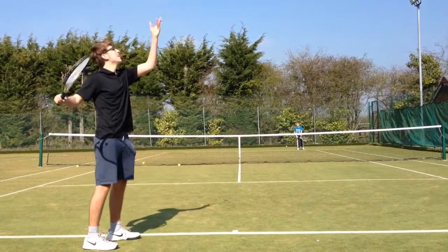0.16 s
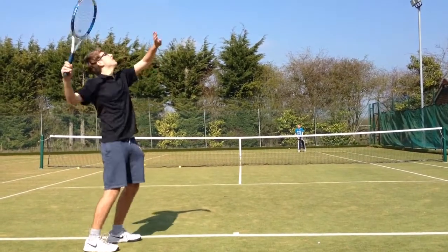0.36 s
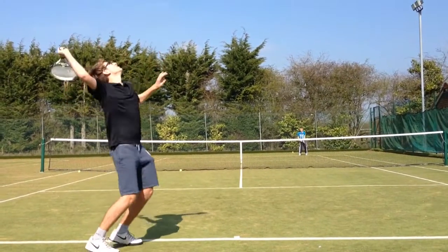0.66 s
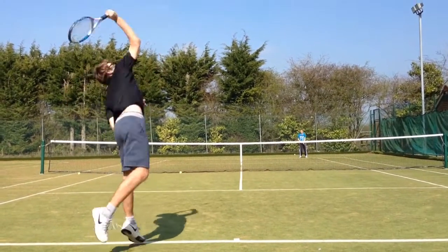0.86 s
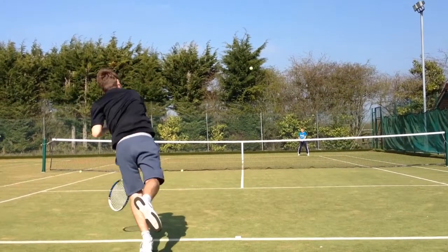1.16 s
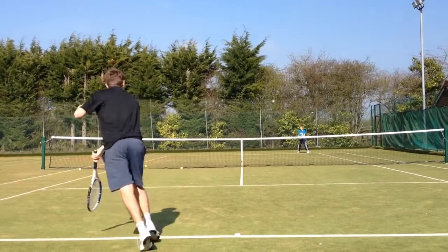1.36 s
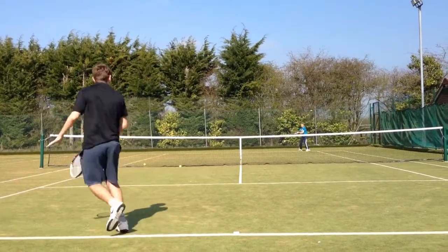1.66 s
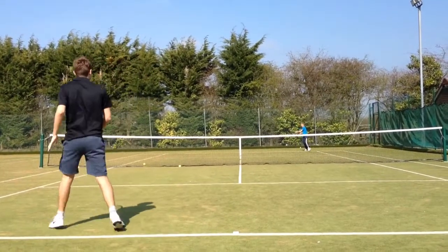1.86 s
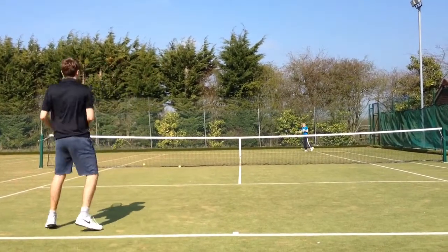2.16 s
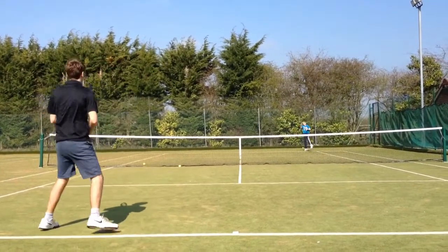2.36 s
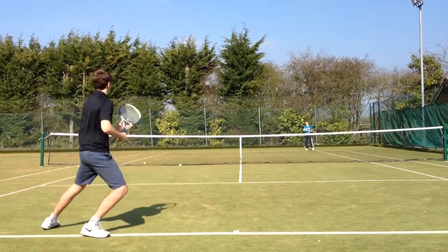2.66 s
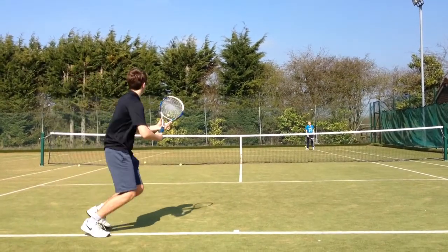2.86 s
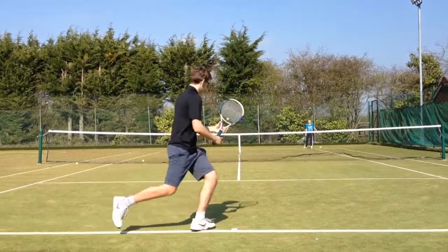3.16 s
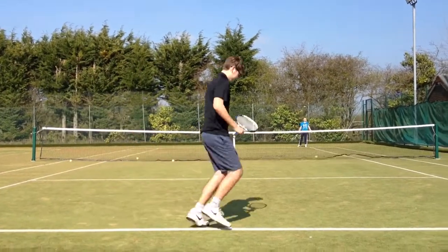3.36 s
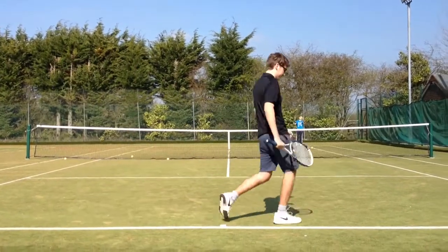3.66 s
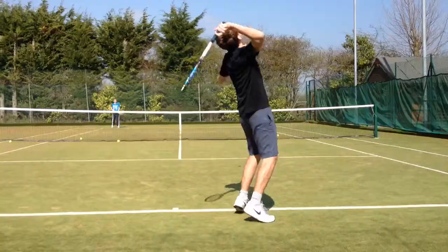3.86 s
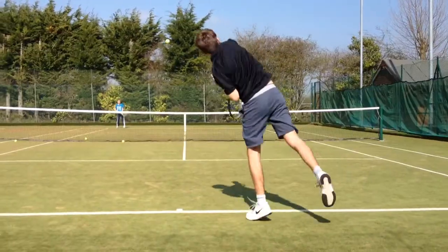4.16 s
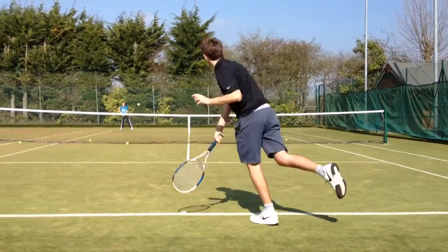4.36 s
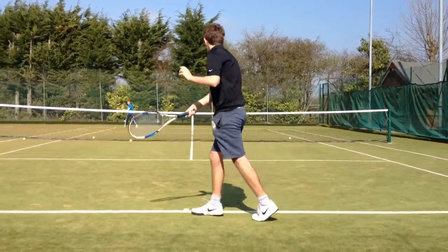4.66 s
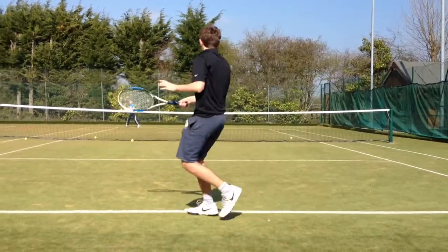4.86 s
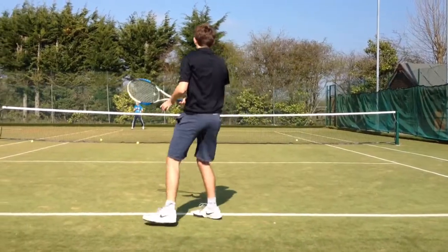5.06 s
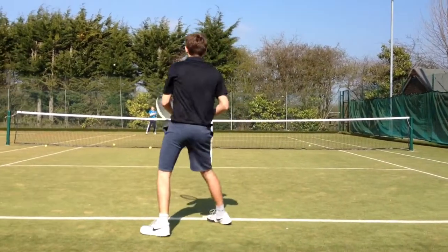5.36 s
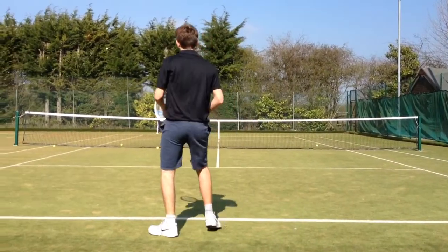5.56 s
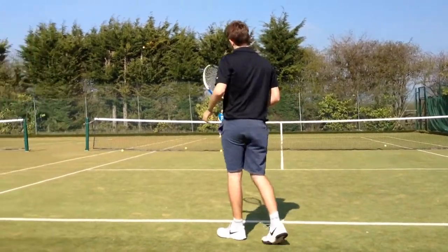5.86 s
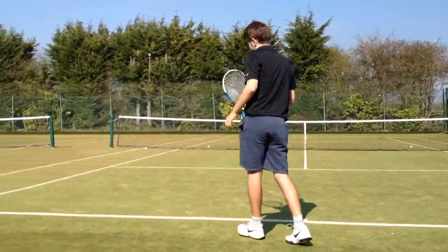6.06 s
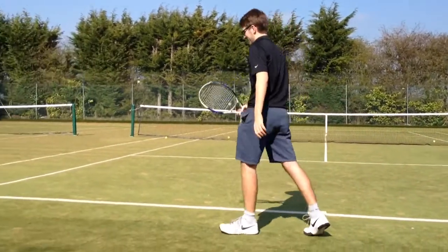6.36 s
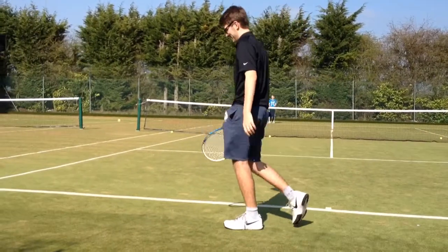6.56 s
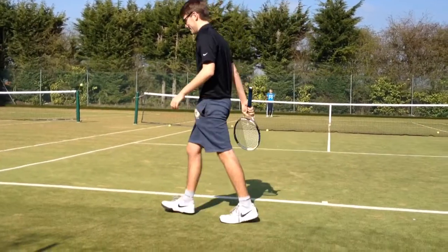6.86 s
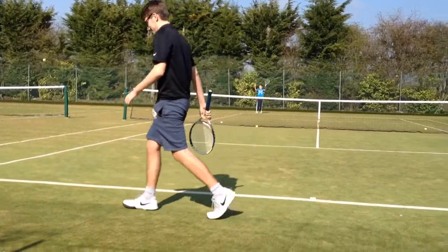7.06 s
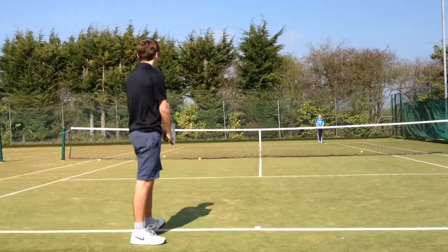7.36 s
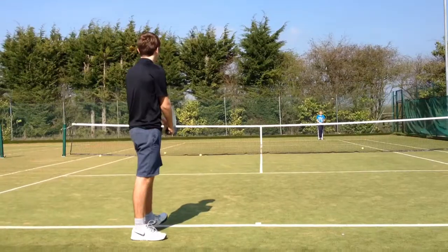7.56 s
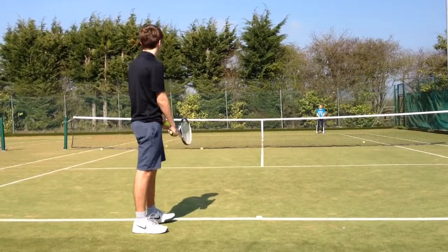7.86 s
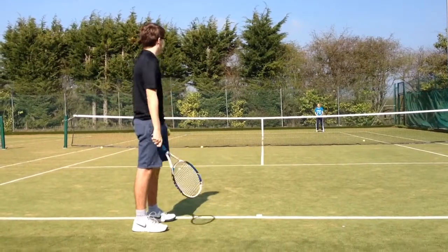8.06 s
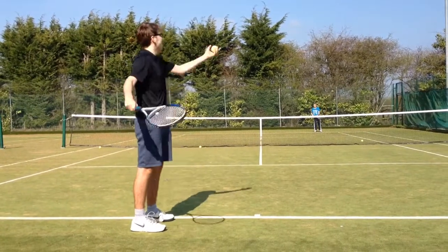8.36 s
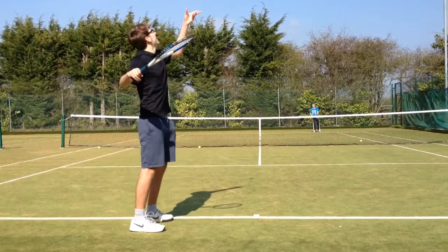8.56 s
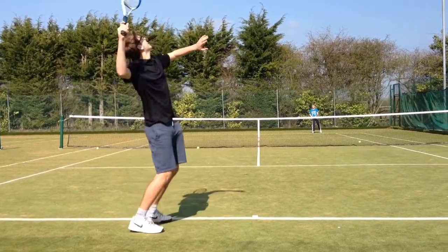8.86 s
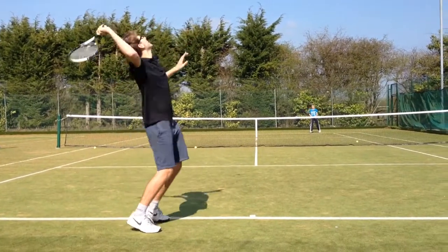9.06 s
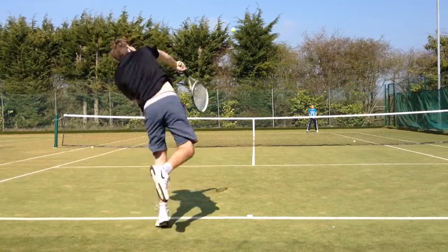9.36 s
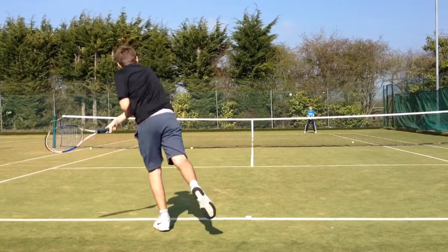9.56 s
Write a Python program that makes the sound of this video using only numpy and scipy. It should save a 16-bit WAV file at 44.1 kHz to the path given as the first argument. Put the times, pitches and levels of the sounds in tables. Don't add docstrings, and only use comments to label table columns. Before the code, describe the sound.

An outdoor tennis court with sandy turf, heard from behind the baseline. Thin bird whistles, mellow far song, a faint fading low hum and soft traffic air open the scene. At 0.9 s a racket swishes and a serve cracks sharply with a short string ring and dull echo from fences. Shoes land and scrape grit through 1.9 s; a quieter, duller return pops at 2.3 s, followed by steps and slides to 3.6 s. At 3.8 s the background switches to heavier traffic. A loud flat serve hits at 4.1 s, a soft return with a tiny second touch at 5.05 s, then shuffles and a faint bounce at 6.7 s. At 7.1 s the air changes again: closer birdsong and a run of chips until 7.8 s, more sparse notes, light foot sounds around 8.6 s, a final serve at 9.3 s, a skid, and quick swooping chirps to the end.

```python
import sys
import numpy as np
from scipy import signal
from scipy.fft import rfft, irfft
from scipy.io import wavfile
from scipy.ndimage import uniform_filter1d

SR = 44100
rng = np.random.default_rng(int(sys.argv[2]) if len(sys.argv) > 2 else 0)


def file_out(sig):
    cols = np.atleast_2d(sig).T
    lim = np.clip(cols, -1, 1)
    pcm = np.round(lim * 32767).astype(np.int16)
    wavfile.write(sys.argv[1], SR, pcm)


def ratio_of_db(decibels):
    return 10 ** (np.asarray(decibels, float) / 20)


N = 428652

# contact t/s, air thump level/dB, thump f/Hz, loudest string ring f/Hz, felt crack level/dB
SERVE_BLOWS = [
    (4.0742, -18.5, 340, 830, -12),
    (9.3066, -19, 350, 880, -12),
]
KICK_BLOWS = [
    (0.9311, -24.5, 326, 1330, -13.5),
]
RETURN_BLOWS = [
    (2.3384, -26.5, 375, 1600, -29),
    (5.0454, -29, 298, 2000, -29.5),
    (5.0703, -37.5, 369, 1950, -43),
]
BOUNCE_BLOWS = [
    (6.6761, -33.5, 290, 1110, -61.5),
]
# t/s, peak level/dB
SUCTION_SNAPS = [
    (.9313, -19),
    (4.0743, -21),
    (5.0458, -29),
    (9.3068, -21),
    (5.0718, -40),
]
# f/Hz, level/dB, t60/s
SERVE_MODES = [(560, -6, .02), (790, 1, 0.021), (950, -6, .022), (1260, -3, 0.04), (1560, -5, 0.09),
               (2000, -2, 0.053), (2300, -3, 0.039), (2600, 0, 0.035), (4600, -2, .03)]
KICK_MODES = [(560, 1.5, 0.031), (1065, -4, 0.032), (1297, -8, 0.037), (1630, -2, 0.044), (2630, -8, .03),
              (3970, -8, .02)]
RETURN_MODES = [(527, 6, 0.018), (800, -6, .03), (1050, -6, .03), (1300, -1, .03), (1620, -6, 0.036),
                (2000, -5, .05), (2660, -5, .03), (3780, -1, 0.022)]
BOUNCE_MODES = [(796, 0, .02), (1070, -5, .03), (1280, 2, .02), (1600, 0, .015)]
# f/Hz, level/dB per Hz
CRACK_SPECTRUM = [(1760, -20), (3000, -6), (3610, -16), (4590, -3), (7900, -7.5), (10500, -17),
                  (13200, -18), (15500, -26)]
# f/Hz, t60/s
COURT_DECAY = [(150, 0.71), (400, 0.6), (1500, 0.86), (4000, 1), (12000, 0.46)]
# contact t/s, level/dB at contact, rise/(dB/s)
RACKET_SWINGS = [
    (0.928, -51, 262),
    (4.074, -50, 258),
    (9.306, -50, 260),
]
# t/s, peak level/dB, thud f/Hz
SOLE_LANDINGS = [(0.996, -36.5, 380), (1.402, -50, 284), (1.859, -37.5, 297), (2.296, -42.5, 387),
                 (2.641, -44.5, 277), (3.405, -43, 251), (3.501, -40.5, 394), (3.832, -41.5, 174),
                 (4.153, -34, 275), (4.649, -37.5, 240), (5.562, -64, 210), (6.728, -39.5, 221.2),
                 (6.914, -49, 219.7), (8.535, -46, 181), (8.676, -47, 193), (9.344, -30, 410)]
# t/s, peak level/dB
GRIT_TICKS = [(0.5544, -54), (0.698, -48), (1.122, -46), (1.402, -45), (2.96, -55), (3.5032, -45),
              (3.8287, -57), (4.243, -36), (7.092, -56), (9.0937, -51), (9.435, -29.5)]
# t/s, peak level/dB
DULL_KNOCKS = [(0.2844, -51), (1.1782, -63), (1.859, -47), (2.644, -47), (2.748, -48), (2.7678, -45),
               (2.964, -48), (3.7356, -39.5), (4.2435, -33), (4.661, -46), (6.7383, -49), (9.635, -52)]
# start t/s, hardest t/s, end t/s, scrape level/dB, rubber ring f/Hz
LOOSE_SKIDS = [(.965, 1.0, 1.033, -51.5, 1500), (2.961, 2.99, 3.02, -57, 1900),
               (1.42, 1.485, 1.5315, -46, 1760), (1.399, 1.412, 1.43, -49, 1500),
               (2.35, 2.36, 2.412, -58, 1080), (2.42, 2.43, 2.45, -63, 2100),
               (4.103, 4.112, 4.145, -48, 930), (4.156, 4.175, 4.19, -45.5, 1500),
               (5.078, 5.086, 5.14, -58.5, 1480), (5.736, 5.762, 5.796, -57.5, 890)]
PILE_BITES = [(1.02, 1.045, 1.077, -40.5, 1800), (3.005, 3.04, 3.05, -49, 1500),
              (3.035, 3.085, 3.116, -41.5, 1750), (1.872, 1.9, 1.925, -48, 1550),
              (2.296, 2.314, 2.325, -58, 900), (3.503, 3.525, 3.55, -48, 1500),
              (3.52, 3.565, 3.588, -48, 1000), (4.658, 4.664, 4.68, -47, 2000),
              (4.675, 4.712, 4.735, -46, 1430), (9.345, 9.375, 9.386, -40.5, 2100)]
PRESSED_DRAGS = [
    (0.799, 0.825, 0.83, -62, 1260),
    (1.33, 1.39, 1.38, -59.5, 1620),
    (2.49, 2.54, 2.553, -60.5, 2490),
    (2.757, 2.774, 2.785, -57.5, 2500),
    (9.165, 9.188, 9.2, -60, 1000),
]
STEP_SHUFFLES = [(1.97, 2.05, 2.074, -58.5, 870), (2.06, 2.11, 2.14, -58.5, 870),
                 (5.385, 5.425, 5.43, -57, 850), (5.44, 5.46, 5.52, -56.5, 850),
                 (5.51, 5.575, 5.62, -56, 905), (6.93, 6.962, 6.99, -63, 900), (7.03, 7.08, 7, -71, 1100),
                 (4.86, 4.94, 4.98, -67.5, 1800)]
# f/Hz, level/dB per Hz
GRIT_SPECTRUM = [(1760, -36), (3000, -8.5), (3790, -4), (4820, -2), (5230, -3), (12300, -13.5),
                 (14700, -16.5), (15500, -18)]
# start t/s, length t/s, start f/Hz, end f/Hz, level/dB
HIGH_WHISTLES = [(0, 0.27, 8130, 8220, -72.5), (.273, .227, 7970, 7750, -81.5), (0, 0.12, 6600, 6750, -79),
                 (0.09, 0.069, 6640, 5500, -73), (.2, .1, 6800, 5650, -82), (0.252, .31, 5090, 5030, -79),
                 (2.15, .137, 6720, 6697, -77), (2.51, 0.12, 5090, 5080, -80), (2.65, .1, 5050, 5030, -84),
                 (2.9, .032, 4800, 4100, -76), (3.584, 0.14, 7900, 8473, -67.5),
                 (3.654, 0.18, 8400, 8290, -65), (4.267, 0.42, 6600, 6520, -85),
                 (4.85, 0.14, 5020, 5020, -87), (6.1, .15, 4600, 4571, -86), (8.285, 0.05, 3950, 4500, -78),
                 (8.53, 0.037, 3430, 4170, -76), (8.67, .2, 3950, 3900, -85.5),
                 (8.889, .11, 4890, 4840, -86), (9.407, 0.023, 6350, 5300, -66),
                 (9.481, 0.036, 4602, 8000, -69), (9.563, 0.15, 7100, 7000, -75)]
FAR_NOTES = [(.078, 0.092, 1690, 2190, -73.5), (0.163, 0.25, 2240, 2130, -71.5),
             (0.379, 0.16, 2477, 2380, -76), (0.57, .136, 2270, 2180, -70.5), (.42, .27, 1667, 1480, -78),
             (3.21, 0.26, 1330, 1300, -73), (3.16, .045, 1850, 1600, -72), (4.2, 0.0394, 1350, 1300, -72),
             (3.301, 0.16, 2420, 2395, -78.5), (3.655, 0.072, 1900, 2040, -70),
             (4.266, 0.15, 1800, 2080, -71), (4.4, 0.13, 2210, 2450, -74), (4.557, 0.082, 1740, 1770, -70),
             (4.87, 0.07, 1900, 2250, -76), (5.177, 0.067, 3310, 3150, -70)]
NEAR_NOTES = [(7.137, 0.036, 2190, 2200, -66), (7.165, .018, 2180, 1900, -64),
              (7.14, 0.052, 1780, 1850, -69.5), (7.336, 0.19, 1950, 1990, -67.5),
              (7.52, 0.13, 2000, 1990, -79), (7.516, 0.03, 1926, 1740, -70), (7.54, 0.017, 1750, 1950, -72),
              (7.561, .052, 1720, 1500, -70.5), (7.62, .06, 1650, 1600, -78),
              (7.722, .02, 1950, 2330, -72.5), (7.74, .016, 2330, 2200, -73),
              (7.768, 0.028, 1980, 2250, -67.5), (8.011, 0.06, 2560, 2570, -70.5),
              (8.066, .048, 2560, 2520, -74), (8.098, 0.028, 2240, 2245, -72),
              (8.136, 0.11, 2186, 2270, -71), (8.24, .13, 2300, 2345, -76.5),
              (8.585, .06, 1520, 1820, -70.5), (8.64, .095, 1816, 1830, -72), (8.97, 0.057, 792, 790, -73)]
BURRED_NOTES = [(0.35, 0.2, 2000, 2710, -78), (8.452, 0.096, 2403, 2330, -71.5),
                (8.47, 0.097, 2050, 2000, -71), (8.504, 0.062, 1800, 1550, -72),
                (9.663, 0.051, 3850, 3450, -64.5), (9.668, 0.056, 3500, 2770, -65),
                (9.623, 0.0148, 8600, 6601, -68), (9.65, .02, 9000, 5700, -69)]
SWOOP_NOTES = [
    (9.514, .028, 8900, 5540, -68),
    (9.544, .022, 8750, 6500, -72),
    (9.595, 0.033, 8600, 7000, -78),
]
# t/s, peak level/dB
FALLING_CHIPS = [(7.1995, -67), (7.3058, -63), (7.3662, -61), (7.431, -59), (7.5093, -59), (7.5837, -57.5),
                 (7.677, -55), (7.7523, -58.5)]
CHANGES_S = (3.83, 7.143)
# f/Hz, level/dB per Hz
AIR_SPECTRA = [
    [(24, -58), (40, -16), (87, -8), (146, -0.5), (192, 4.5), (316, -6.5), (533, -10), (702, -17),
     (1720, -22), (8060, -27.5), (9840, -35.5), (15400, -27)],
    [(24, -46), (40, -18), (129, -3), (178, 2), (316, -8.5), (561, -23.5), (1130, -26), (1370, -22),
     (1760, -27.5), (6940, -36), (10300, -41.5), (15400, -37)],
    [(24, -55), (40, -32), (96, -7), (183, 0.5), (266, -10), (324, -13), (561, -23), (3540, -29.5),
     (7670, -33.5), (10100, -39.5), (14300, -34.5), (15400, -26)],
]
# t/s, rumble level/dB
TRAFFIC_SWELLS = [
    [(0.0, -64.5), (1.14, -63.5), (1.65, -67), (2.43, -63.5), (3.28, -67.5), (3.83, -64.5)],
    [(3.83, -59), (4.03, -54), (4.7, -59.5), (5.47, -58.5), (6.96, -59), (7.14, -59)],
    [(7.14, -68), (7.43, -62.5), (7.55, -65), (8.12, -65), (8.87, -59.5), (9.72, -63)],
]


def rms_one(x):
    return x / np.sqrt(np.mean(x ** 2) + 1e-20)


def at_hz(points, hz):
    points = np.array(points)
    return np.interp(np.log(np.maximum(hz, 1)), np.log(points[:, 0]), points[:, 1])


def coloured(x, spectrum):
    hz = np.fft.rfftfreq(len(x), 1 / SR)
    return rms_one(irfft(rfft(x) * ratio_of_db(at_hz(spectrum, hz)), len(x)))


def band(x, low_hz, high_hz):
    edges_hz = [low_hz, min(high_hz, SR / 2.3)]
    return signal.sosfilt(signal.butter(2, edges_hz, "band", fs=SR, output="sos"), x)


def drift(rate_hz):
    knots_hz = 60
    knots = rng.standard_normal(int(N / SR * knots_hz))
    r = np.exp(-2 * np.pi * rate_hz / knots_hz)
    slow = rms_one(signal.lfilter([1], [1, -2 * r, r * r], knots))
    return np.interp(np.arange(N) / SR * knots_hz, np.arange(len(slow)), slow)


def flutter(length, size):
    return rms_one(uniform_filter1d(rng.standard_normal(length), size=size))


def add(out, s, x):
    i = round(s * SR)
    out[i:i + len(x)] += x[:N - i]


def swelling(t, hz, peak_s, sharp):
    envelope = (t / peak_s * np.exp(1 - t / peak_s)) ** sharp
    return envelope * np.sin(2 * np.pi * hz * t)


def court_tail():
    t, tail = np.arange(int(.6 * SR)) / SR, 0
    edges_hz = 100 * 2 ** np.arange(0, 7.5, .5)
    for low_hz, high_hz in zip(edges_hz, edges_hz[1:]):
        noise = band(rng.standard_normal(len(t)), low_hz, high_hz)
        tail = tail + noise * ratio_of_db(-60 * t / at_hz(COURT_DECAY, low_hz))
    tail = tail * np.clip((t - .006) / 0.0038, 0, 1)
    return tail / np.sqrt(np.sum(tail ** 2))


def air_thump(t, level_db, hz):
    late = np.maximum(t - .0011, 0)
    sag, sag_s = .07, .002
    bent = late + sag * sag_s * (1 - np.exp(-late / sag_s))
    return ratio_of_db(level_db + 6.5) * band(swelling(bent, hz, peak_s=0.0021, sharp=1.6), 100, 1600)


def felt_crack(t, touch, level_db):
    squash = ratio_of_db(.12 * (level_db + 12)) * np.exp(-((t - .0035) / 0.0033) ** 2)
    squash = squash + 0.34 * np.exp(-t / 0.017)
    burst = np.clip(t / 0.00041, 0, 1) * (touch + squash)
    felt = rfft(burst * rng.standard_normal(len(t)))
    felt = irfft(felt / uniform_filter1d(np.abs(felt), size=40), len(t))
    return ratio_of_db(level_db - 18.5) * np.sqrt(np.mean(burst ** 2)) * coloured(felt, CRACK_SPECTRUM)


def string_ring(t, touch, modes, level_db, ring_hz, rattle_db):
    out = np.zeros(len(t))
    for (hz, mode_db, t60_s), phase in zip(modes, rng.standard_normal(len(modes))):
        near_db = 9 * np.exp(-(np.log2(hz / ring_hz) / 0.31) ** 2)
        decay = ratio_of_db(level_db - 5 + mode_db + near_db - 60 * t / t60_s)
        out += decay * (1 - np.exp(-t / 0.0015)) * np.sin(2 * np.pi * hz * t + 3 * phase)
    rattle = band(rng.standard_normal(len(t)), .85 * ring_hz, 1.7 * ring_hz)
    rattle = rms_one(band(rattle, .85 * ring_hz, 1.9 * ring_hz))
    shake = 1.7 * touch + np.clip(t / 0.0026, 0, 1) * np.exp(-t / 0.011)
    return out + ratio_of_db(level_db + rattle_db) * shake * rattle


def court_answer(out, s, thump, thump_db, ring_db, ring_hz, crack_db, echo_db, boom_db):
    tail = court_tail()
    add(out, s, ratio_of_db(echo_db) * signal.fftconvolve(thump, tail))
    ring = band(band(tail, 720, 1700), 0.12 * ring_hz, 2.0 * ring_hz)
    add(out, s, ratio_of_db(echo_db + ring_db + 32) * ring)
    boom = band(band(tail, 350, 550), 350, 550)
    add(out, s, ratio_of_db(echo_db + thump_db + boom_db + 38) * boom)
    add(out, s, ratio_of_db(echo_db + crack_db + 7.0) * band(tail, 2400, 12000))


def blows():
    out, t = np.zeros(N), np.arange(int(.08 * SR)) / SR
    touch = 2.1 * np.exp(-t / 0.00086)
    # blows, modes, ring/dB over thump, rattle/dB, court echo/dB, windbreak boom/dB
    kinds = ((SERVE_BLOWS, SERVE_MODES, -0.1, -8, -18, -15),
             (KICK_BLOWS, KICK_MODES, -1, -11.5, -16, -5),
             (RETURN_BLOWS, RETURN_MODES, -10.5, -11, -14, 0),
             (BOUNCE_BLOWS, BOUNCE_MODES, -11.5, -22, -19, -12))
    for rows, modes, ring_over_db, rattle_db, echo_db, boom_db in kinds:
        for s, thump_db, thump_hz, ring_hz, crack_db in rows:
            ring_db = thump_db + ring_over_db
            thump = air_thump(t, thump_db, thump_hz)
            pop = thump + felt_crack(t, touch, crack_db)
            pop = pop + string_ring(t, touch, modes, ring_db, ring_hz, rattle_db)
            add(out, s, pop)
            add(out, s + .0082, ratio_of_db(-17) * band(pop, 400, 2800))
            court_answer(out, s, thump, thump_db, ring_db, ring_hz, crack_db, echo_db, boom_db)
    lead_s, width_s = .0005, .00007
    pulse = band(np.exp(-((t - lead_s) / width_s) ** 2), 1300, 9000)
    for s, peak_db in SUCTION_SNAPS:
        add(out, s - lead_s, -ratio_of_db(peak_db + 2.5) * pulse)
    return out


def swings():
    t, level = np.arange(N) / SR, 0
    for s, top_db, rise_db_per_s in RACKET_SWINGS:
        level = level + ratio_of_db(top_db - rise_db_per_s * np.abs(s - t)) * (t < s + .01)
    return level * rms_one(band(rng.standard_normal(N), 260, 5950))


def feet():
    out, t = np.zeros(N), np.arange(int(.04 * SR)) / SR
    for s, peak_db, hz in SOLE_LANDINGS:
        add(out, s, ratio_of_db(peak_db - 1) * swelling(t, hz, peak_s=0.002, sharp=1.8))
    for rows, low_hz, high_hz in ((GRIT_TICKS, 4840, 10500), (DULL_KNOCKS, 1000, 3900)):
        for s, peak_db in rows:
            snap = band(rng.standard_normal(len(t)) * np.exp(-t / 0.0015), low_hz, high_hz)
            add(out, s, ratio_of_db(peak_db - 5.5) * snap / np.abs(snap).max())
    return out


def rubber_rings(grains, pitches_hz):
    dealt, rings = rng.integers(0, len(pitches_hz), N), []
    for k, hz in enumerate(pitches_hz):
        r, w = ratio_of_db(-60 * hz / (14.0 * SR)), 2 * np.pi * hz / SR
        struck = grains * (dealt == k) + 1e-18
        ringing = signal.lfilter([0, np.sin(w)], [1, -2 * r * np.cos(w), r * r], struck)
        rings.append(rms_one(band(ringing, hz / 2, hz * 2)) * ratio_of_db(3.5 * drift(15)))
    return np.array(rings)


def slides():
    t, out = np.arange(N) / SR, np.zeros(N)
    sizes = ratio_of_db(3 * np.minimum(rng.exponential(1, N), 4))
    grains = sizes * rng.choice([-1, 1], N) * (rng.random(N) < 6000 / SR)
    pitches_hz = np.geomspace(680, 3200, 16)
    rings = rubber_rings(grains, pitches_hz)
    pitches_hz = pitches_hz[:, None]
    tread_db = 5 * np.exp(-(np.log2(pitches_hz / 2300) / 0.056) ** 2)
    hiss = coloured(grains + 1.04 * rng.standard_normal(N), GRIT_SPECTRUM)
    body = rms_one(band(grains, 252, 560))
    judder_db = 2.5 * np.tanh(drift(27))
    lift_db, stop_s, stop_db = 5, 0.0093, 10
    settle_s, settle_db = 0.061, 15.5
    falls_db = np.cumsum([lift_db, stop_db, settle_db])
    # slides, rise to hardest/dB, grit hiss/dB
    kinds = ((LOOSE_SKIDS, 7.4, 1.45), (PILE_BITES, 6, -5.5), (PRESSED_DRAGS, 19, 0.15), (STEP_SHUFFLES, 6, -4))
    for rows, rise_db, grit_db in kinds:
        for *s, top_db, ring_hz in rows:
            s = [*np.sort(s), max(s) + stop_s, max(s) + stop_s + settle_s]
            near = slice(round(s[0] * SR), round(s[-1] * SR))
            edge = np.minimum((t[near] - s[0]) / 0.0012, (s[-1] - t[near]) / 0.0076)
            edge = np.clip(edge, 0, 1)
            octaves = np.log2(pitches_hz / ring_hz)
            share = ratio_of_db(10 * np.exp(-(octaves / .22) ** 2) + tread_db)
            scrape = np.sum(share * rings[:, near], axis=0) / np.sqrt(np.sum(share ** 2, axis=0))
            scrape = scrape / np.sqrt(uniform_filter1d(scrape ** 2, size=900))
            press_db = np.interp(t[near], s, top_db - np.array([rise_db, 0, *falls_db])) + judder_db[near]
            hiss_level = ratio_of_db(-59.5 + grit_db + 0.89 * (press_db + 55))
            body_level = ratio_of_db(-58.5 + 0.64 * (press_db + 55))
            out[near] += edge * (ratio_of_db(press_db) * scrape + hiss_level * hiss[near] + body_level * body[near])
    return out + ratio_of_db(-23.0) * signal.fftconvolve(out, court_tail())[:N]


def whistle(start, end, hz0, hz1, hz2, level_db, rasp_hz, fade_s=0.0077):
    u = np.linspace(0, 1, max(int((end - start) * SR), 9))
    hz = hz0 * (1 - u) * (1 - 2 * u) + 4 * hz1 * u * (1 - u) + hz2 * u * (2 * u - 1)
    hz = hz + rasp_hz * flutter(len(u), 150)
    fade = np.clip(np.minimum(u, 1 - u) * (end - start) / fade_s, 0, 1)
    return np.sqrt(2) * ratio_of_db(level_db) * fade * np.sin(2 * np.pi * np.cumsum(hz) / SR)


def glide(start, length, from_hz, to_hz, level_db, arch):
    return start, start + length, from_hz, (from_hz + to_hz) / 2 * (1 + arch), to_hz, level_db


def birds():
    song, chips = np.zeros(N), np.zeros(N)
    whistle_arch, song_arch = 0.0037, 0.0116
    for rows, arch in ((HIGH_WHISTLES, whistle_arch), (NEAR_NOTES, song_arch)):
        for note in rows:
            add(song, note[0], whistle(*glide(*note, arch), rasp_hz=18))
    for s, length, top_hz, low_hz, level_db in SWOOP_NOTES:
        swoop = whistle(s, s + length, top_hz, low_hz, top_hz, level_db, rasp_hz=60.0, fade_s=0.0015)
        add(song, s, swoop)
    for note in FAR_NOTES:
        tone = whistle(*glide(*note, song_arch), rasp_hz=36.0)
        add(song, note[0], tone * (0.79 + 0.23 * flutter(len(tone), 400)))
    for note in BURRED_NOTES:
        tone = whistle(*glide(*note, arch=0), rasp_hz=37.3)
        add(song, note[0], tone * flutter(len(tone), 110))
    for s, peak_db in FALLING_CHIPS:
        chip = glide(0, 0.027, 3850, 3150, peak_db - 10.5, arch=0)
        add(chips, s - .012, whistle(*chip, rasp_hz=33))
    song = song * ratio_of_db(3 * np.tanh(drift(22)))
    far = band(ratio_of_db(-9) * song + ratio_of_db(-15) * chips, 600, 4200)
    return song + chips + signal.fftconvolve(far, court_tail())[:N]


def hum():
    t = np.arange(N) / SR
    tone = np.sin(2 * np.pi * np.cumsum(109.3 * (1 + 0.0044 * drift(1.5))) / SR)
    level_db = -64 - 1.5 * t + 2.5 * drift(6.4)
    return ratio_of_db(level_db) * np.clip((3.38 - t) / .03, 0, 1) * tone


def air():
    t, out = np.arange(N) / SR, np.zeros(N)
    ends = [0, *CHANGES_S, N / SR]
    drones_db = (2.5, 2.5, 1)
    hz = np.fft.rfftfreq(N, 1 / SR)
    low_share = 1 / (1 + (hz / 330) ** 4)
    drone_share = (1 - low_share) / (1 + (hz / 3000) ** 4)
    shares = (low_share, drone_share, 1 - low_share - drone_share)
    for spectrum, rows, drone_db, start, end in zip(AIR_SPECTRA, TRAFFIC_SWELLS, drones_db, ends, ends[1:]):
        s, rumble_db = np.transpose(rows)
        roar = rfft(coloured(rng.standard_normal(N), spectrum))
        rumble, drone, hiss = (irfft(roar * share, N) for share in shares)
        mean = ratio_of_db(np.mean(rumble_db)) / rumble.std()
        swell_db = np.interp(t, s, rumble_db - np.mean(rumble_db))
        mix = ratio_of_db(swell_db + 2.0 * drift(8.7)) * rumble
        mix = mix + ratio_of_db(drone_db + 0.21 * swell_db + 1.006 * drift(13)) * drone
        mix = mix + ratio_of_db(-1.04) * hiss
        out += mean * mix * ((t >= start) & (t < end))
    return out


def scene():
    return (blows() + swings() + feet() + slides() + birds() + hum() + air())[None, :]


def top_cut(x):
    return signal.sosfilt(signal.butter(12, 16280, fs=SR, output="sos"), x)


def record(dry):
    heard = signal.sosfilt(signal.butter(2, 75.5, "high", fs=SR, output="sos"), dry)
    heard = signal.sosfilt(signal.cheby2(12, 45, 15650, fs=SR, output="sos"), heard)
    return top_cut(heard)


dry = scene()
out = record(dry)
file_out(out)
```